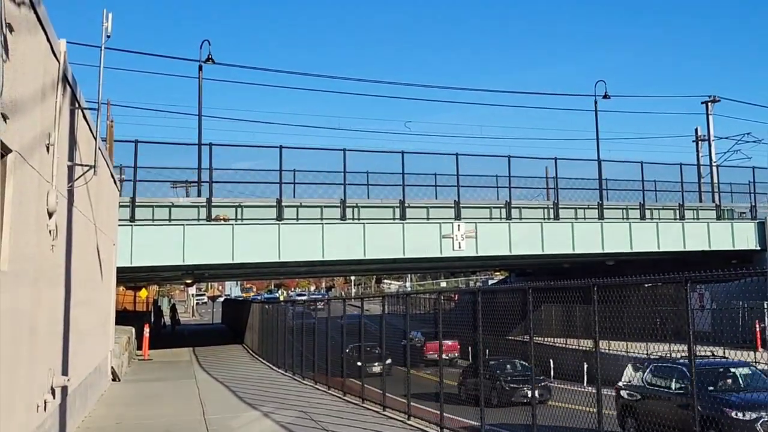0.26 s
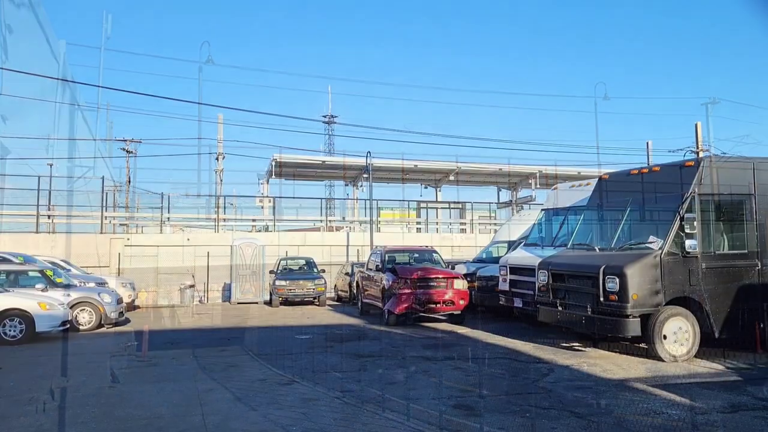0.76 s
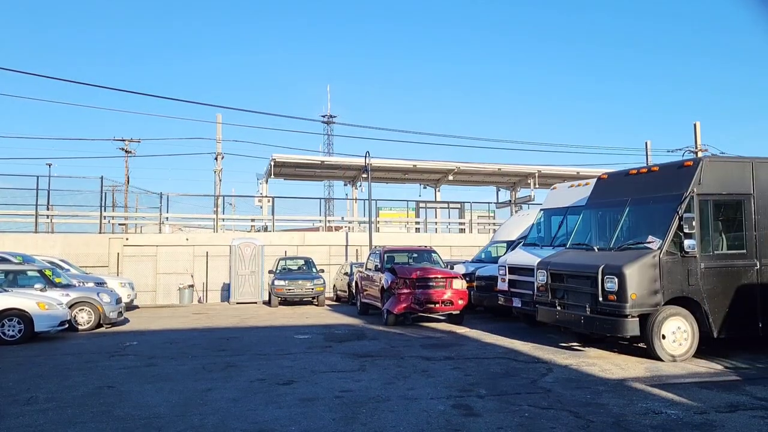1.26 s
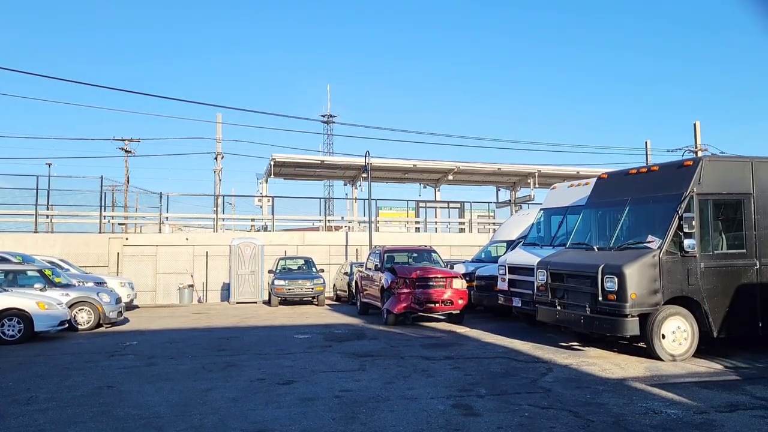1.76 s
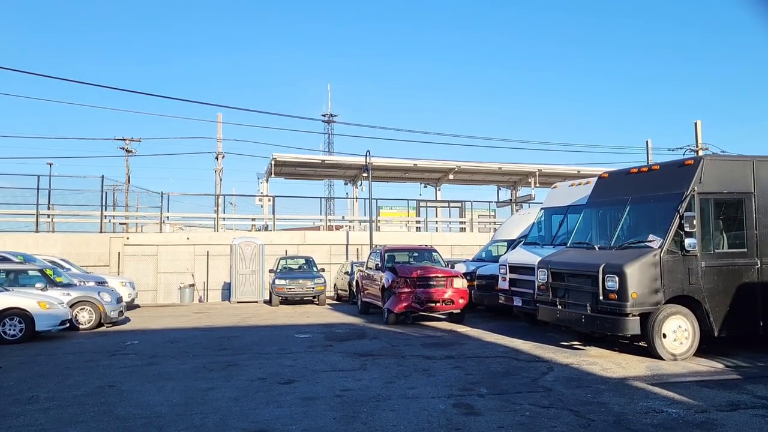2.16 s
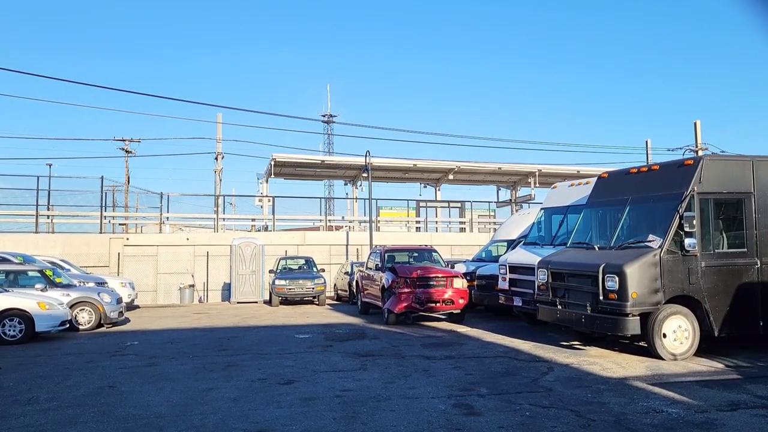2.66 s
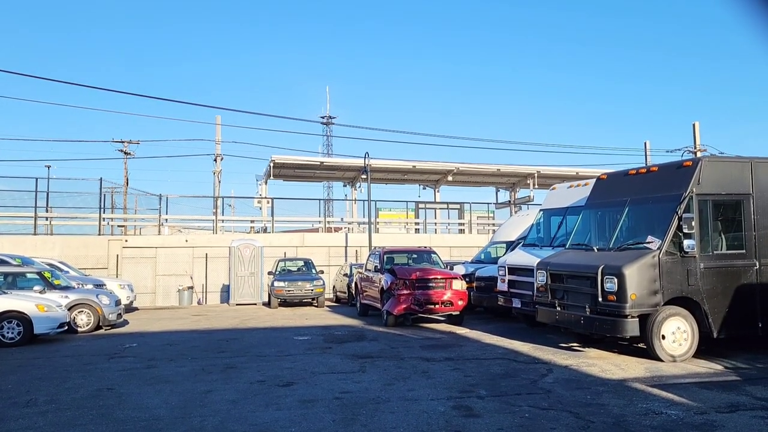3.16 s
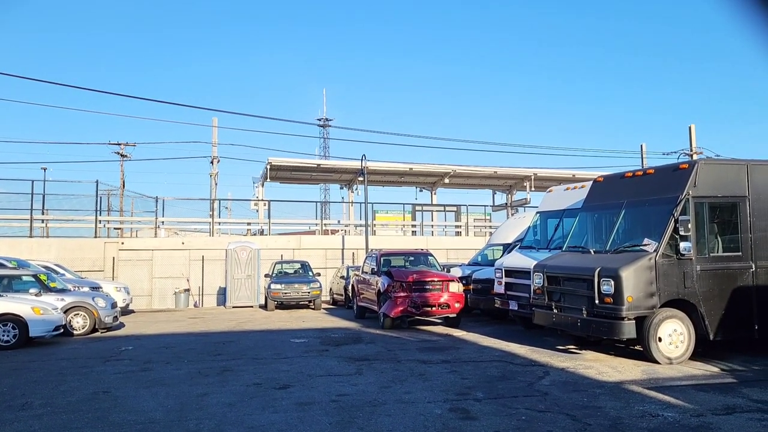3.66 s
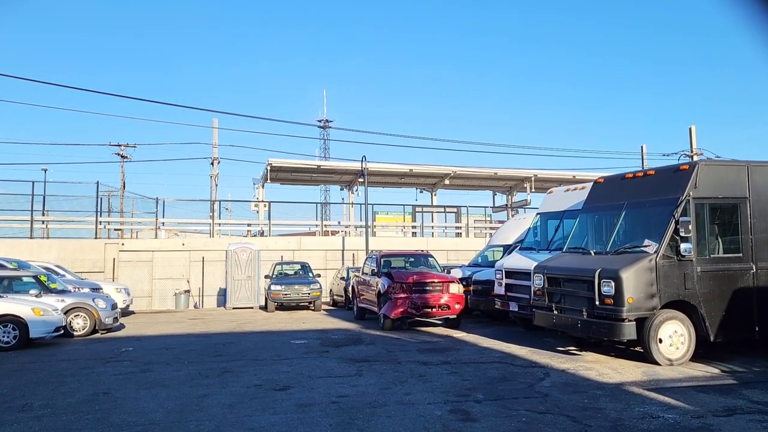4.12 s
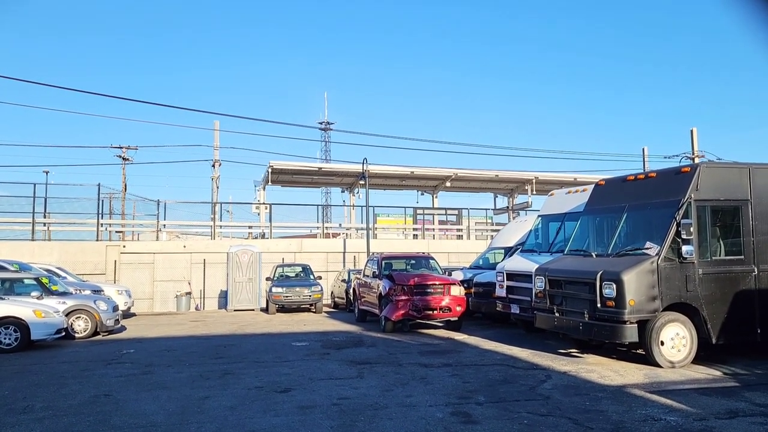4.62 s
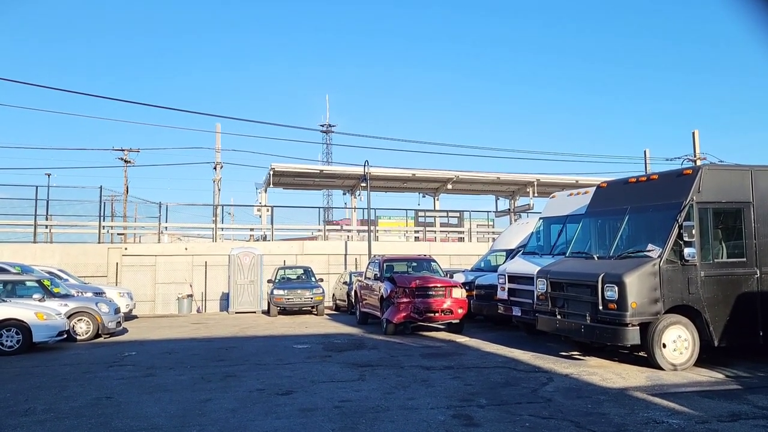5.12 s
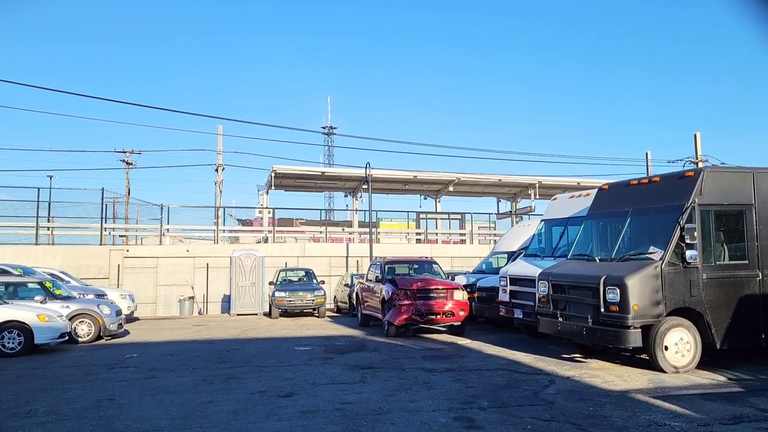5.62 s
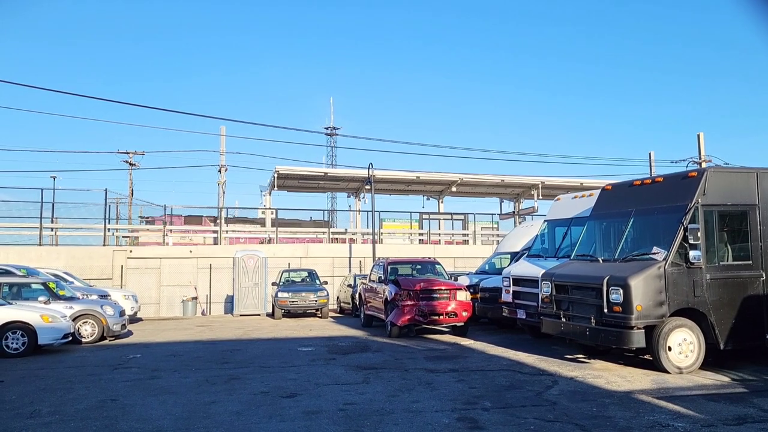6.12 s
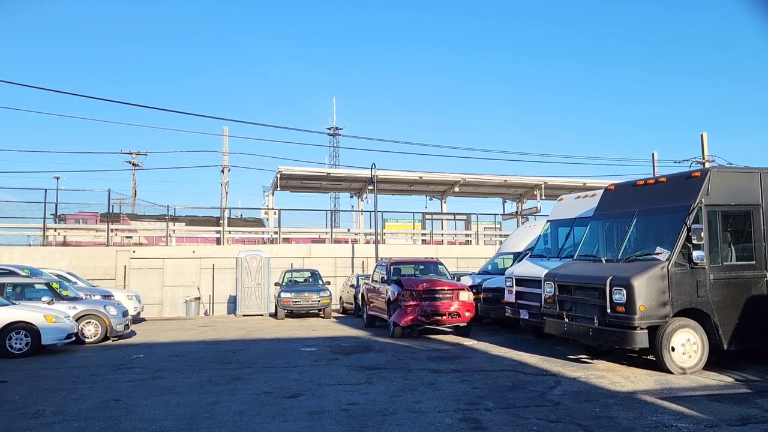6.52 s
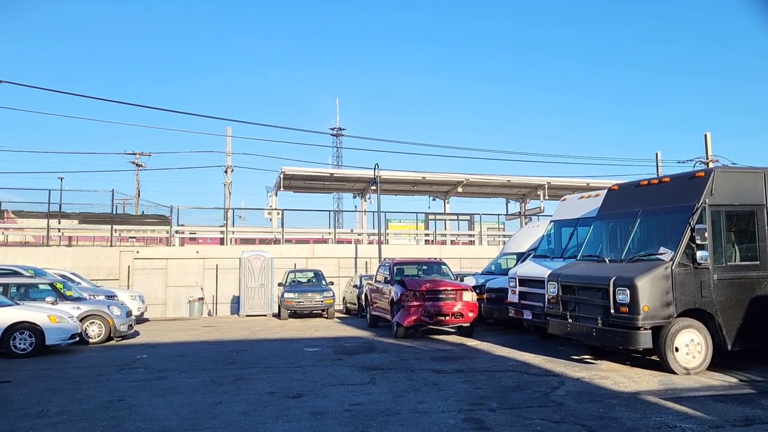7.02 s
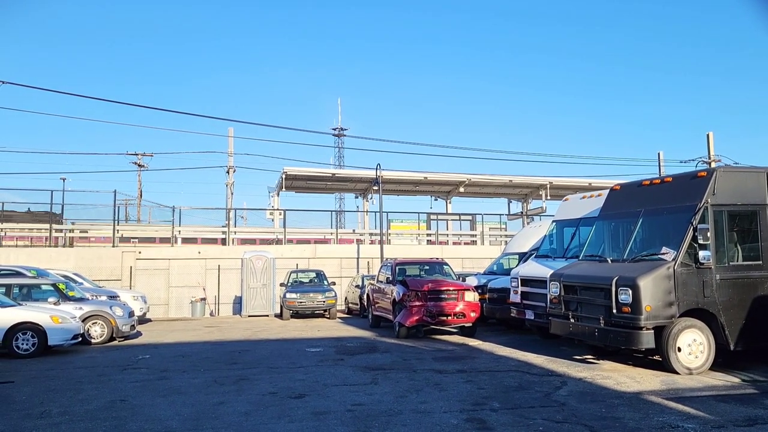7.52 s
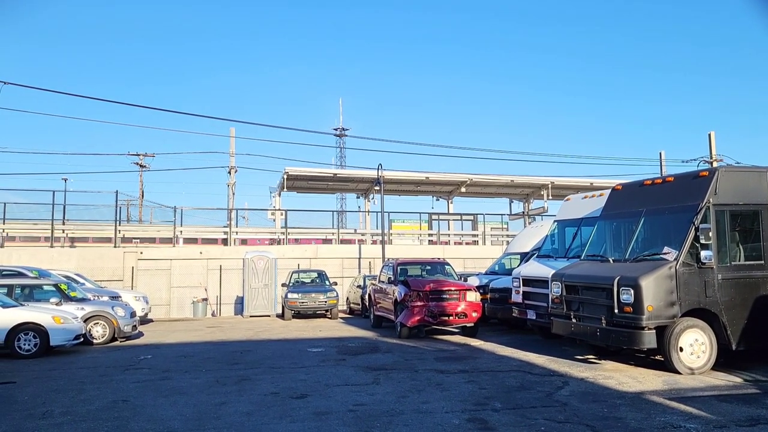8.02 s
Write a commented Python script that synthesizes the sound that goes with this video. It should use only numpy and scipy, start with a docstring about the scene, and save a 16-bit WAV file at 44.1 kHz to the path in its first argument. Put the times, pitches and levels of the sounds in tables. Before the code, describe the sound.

A diesel train draws near with a low pulsing boom, one sharp air spit and growing wheel noise, after passing cars fade out.

```python
"""A parking lot 36 m from a raised track, on a stereo pair of microphones, with the town humming far off.
Tyres and a revving motor under a bridge fade out as a diesel train draws near from the right. Its exhaust
booms and throbs as the engine eases and picks up, a generator and a car body drone, and the wheels roar,
sing and scrape ever louder until they come abreast. A valve spits air once and rings round the lot;
a few light ticks and clinks sound, with a faint rustle at the start."""
import sys
import numpy as np
from scipy import signal
from scipy.fft import rfft, irfft
from scipy.io import wavfile
from scipy.ndimage import uniform_filter1d

SR = 44100
rng = np.random.default_rng(int(sys.argv[2]) if len(sys.argv) > 2 else 0)


def wrap_up_sound(samples):
    """Save the sound to the file named by the first command line argument, as 16-bit audio."""
    columns = np.atleast_2d(samples).T
    # keep every value between -1 and 1, then stretch to whole-number steps
    tamed = np.clip(columns, -1, 1)
    steps = np.round(tamed * 32767).astype(np.int16)
    wavfile.write(sys.argv[1], SR, steps)


N = 365148
TIME = np.arange(N) / SR
FRAME_TIME, HZ = np.arange(N // 256 + 5) * 256 / SR, np.fft.rfftfreq(1024, 1 / SR)  # short-time grid

# a straight track at steady speed; each part of the train is nearest the microphones at its own moment
SPEED_M_PER_S, DISTANCE_M, SOUND_M_PER_S = 14.3, 36, 343
HEAD_NEAREST_S, WHEELS_NEAREST_S, GENERATOR_NEAREST_S = 5.96, 7.36, 7.5
ABREAST = (7.12, .47)  # the droning car goes by: t/s, half length/s

# colour of the microphone pair: f/Hz, left minus right/dB
MIC_BALANCE = [(60, 6), (150, 1.5), (500, 0.7), (900, 0.9), (1350, -2), (2000, -4), (3000, 4.5), (4300, -2),
               (5500, 6.5), (6800, 10.5), (8300, 12), (9600, -0.5), (12000, -1), (15000, 7)]
# noise spectra of far traffic, high rustle and tyres under the bridge: f/Hz, level/dB
TOWN_SPECTRUM = [(150, -8.5), (230, -8.5), (340, 4), (410, -1), (520, -2), (700, -4), (950, -11),
                 (1200, -16.5), (2200, -17), (4000, -41), (16000, -85.5)]
RUSTLE_SPECTRUM = [(2500, -23), (5500, 5), (8000, -4.5), (9500, -3), (13000, -2.5), (16000, -9.5)]
TYRE_SPECTRUM = [(35, -41), (55, -12), (85, -3.5), (125, -1.5), (190, -7), (235, -5.5), (310, -8),
                 (480, -14.5), (580, -12), (800, -19), (1100, -19), (1500, -24.5), (2100, -25), (2550, -30),
                 (4200, -32), (6200, -45), (8100, -48.5), (9500, -56.5), (14500, -57), (16000, -49.5)]
# puffs of rustle: t/s, half length/s, level/dB
RUSTLE_PUFFS = [(.08, .3, -57), (1.18, .08, -72), (1.37, 0.11, -66), (1.55, .06, -65.5), (1.66, .1, -77)]
# ticks and clinks, and last a wheel scrape: t/s, relative level/dB, centre f/Hz, width/octaves, decay/s
TICKS_AND_SCRAPE = [(0.947, -54, 6500, 0.45, 0.0018), (.983, -60, 8500, .7, .0015),
                    (1.428, -49, 13000, 0.33, 0.0019), (1.729, -65, 10000, 0.8, .002),
                    (2.148, -70, 12000, .4, .016), (2.203, -45, 1750, .5, .016),
                    (2.266, -32, 750, 0.5, 0.004), (2.348, -46, 1850, .6, .008),
                    (3.074, -37.5, 2170, 0.1, 0.018), (3.078, -65, 6030, 0.57, .02),
                    (4.494, -42, 3000, 0.55, 0.033)]
# motor revving on the road: t/s, cycle rate/Hz
MOTOR_REVS = [(0, 14.4), (.3, 14.6), (.6, 15.3), (.85, 14.9)]
# its tones: multiple of the cycle, relative starting level/dB, fall/(dB/s)
MOTOR_ORDERS = [(3.5, -8, 4), (6, 0.5, -2), (8.5, 1, 16), (10, 4.5, 5), (11, -2, 2), (14, -14.5, 3),
                (16, 4, 16), (19, -11.5, 11.5), (20, -12, 0), (22, -19, 2.5), (26, -15, 8)]

# spectra of the valve's opening pop and its air jet: f/Hz, level/dB
POP_SPECTRUM = [(600, -30), (1200, 0), (1550, 2), (2100, 0), (3100, 1), (4000, -4), (5500, -11),
                (7300, -21), (8150, -12), (9200, -31), (16000, -28)]
JET_SPECTRUM = [(600, -35), (1200, -16), (1450, 0), (1700, 3), (2000, 6), (3200, 3), (4100, -1), (5000, -5),
                (6200, -7.5), (7200, -9), (8300, -6), (9100, -17), (12200, -11.5), (14500, -7),
                (16000, -20)]
# ring of the spit round the lot: f/Hz, time to fall by 60 dB in s
LOT_DECAY = [(1000, 1), (3000, 1), (5000, 0.46), (8000, 0.56), (8650, 0.66), (9500, 0.39), (16000, 0.28)]
# resonances of the valve's metal, and of wheel and rail: f/Hz, width/Hz, lift/dB
VALVE_MODES = [(1910, 120, 6), (2650, 90, 3), (3100, 90, 5), (3870, 180, 8), (5230, 100, 4), (7960, 200, 7),
               (8600, 200, 4), (12150, 500, 7)]
WHEEL_MODES = [(1000, 57, 1), (1535, 50, 1), (2980, 96, 0.5), (5230, 100, 4.5), (7800, 220, 4)]

# spectra of car body, rail-head sizzle, scrapes, wheel roar, rail hiss and track bed: f/Hz, level/dB
BODY_SPECTRUM = [(90, -23), (160, -11), (205, 3), (250, -2), (310, 0), (370, -3), (420, -18), (900, -47.5),
                 (16000, -110)]
SIZZLE_SPECTRUM = [(2500, -24), (5500, 1.5), (8000, -0.5), (10300, -1.5), (12800, -2.5), (13400, -9.5),
                   (16000, -18)]
SCRAPE_SPECTRUM = [(1100, -29), (1400, -1), (1700, -10), (2400, -8.5), (2850, 0), (3400, -0.5),
                   (4200, -0.5), (5000, -12), (5800, -21), (8200, -24.5), (9500, -40), (16000, -60)]
ROAR_SPECTRUM = [(200, -20.5), (340, -4.5), (430, -1), (560, 2.5), (780, -1.65), (1000, -3), (1180, -9.5),
                 (1440, -4.5), (1650, -11.5), (1850, -10), (2200, -16.5), (2550, -24), (4000, -43),
                 (16000, -87)]
HISS_SPECTRUM = [(1000, -2.5), (2000, 1), (2550, -1), (2900, 1), (3400, 0.5), (4100, -1), (5000, -5.5),
                 (5700, -14), (6800, -17), (8200, -22), (9100, -29), (12500, -40), (16000, -46)]
RUMBLE_SPECTRUM = [(25, -33), (45, 0), (70, 3), (115, 4.5), (150, 4.5), (200, 3.5), (290, 0), (380, -4),
                   (900, -44), (16000, -100)]
# scrapes of wheel on rail: t/s, half length/s, level/dB
SCRAPES = [(5.632, 0.074, -47), (5.778, .055, -40.5), (6.06, .1, -48), (6.33, 0.05, -43),
           (6.485, 0.11, -45.5), (6.782, 0.093, -48.5), (7.083, .04, -41.5), (7.3, .035, -47.5)]
# singing wheels: f/Hz, width/Hz, level/dB, loudest t/s, half length/s
WHEEL_TONES = [(997, 11, -42.5, 5.8, 1.15), (971, 29, -42.5, 6.47, 0.68), (910, 18, -42.5, 6.45, 1.1),
               (880, 18, -42.5, 6.7, .45), (1330, 37, -45.5, 6.45, .6), (1382, 45, -45.5, 6.7, 1),
               (1527, 65, -48, 6.9, 0.94), (890, 60, -37.5, 7.72, .2), (1008, 50, -43.5, 7.72, .2)]
# surges over rough rail: t/s, half length/s, roar lift/dB, hiss lift/dB
RAIL_SURGES = [(1.3, .5, 3.5, 4.7), (3, 0.28, 0.8, 3), (3.95, .2, 2, 2), (4.422, 0.41, 3, 2),
               (5.152, .3, 0, 2), (6.146, .13, -1, -1), (6.85, .5, -0.5, 1.3), (7.803, .2, 2, 1.2)]
# the track bed swells under load: t/s, half length/s, lift/dB
RUMBLE_SWELLS = [(4.48, 0.22, 7), (5.0, .25, 2.5), (5.752, 0.24, 1.5)]

# the generator's firing tone and its octave: t/s, level/dB
GENERATOR_FIRING = [(0.9, -32), (3.74, -33.5), (4.04, -40.5), (4.52, -23), (4.72, -39), (5.0, -22),
                    (5.84, -25.5), (6.78, -37.5), (7.6, -21.5), (8.26, -23.5)]
GENERATOR_OCTAVE = [(0.9, -44.5), (3.28, -51.5), (3.95, -44.5), (4.2, -38.5), (4.7, -40), (5.55, -43),
                    (5.8, -35), (6.2, -35), (6.72, -43.5), (6.92, -28.5), (8.26, -46)]
# its weaker tones: multiple of the cycle, base level/dB, lift under load/dB, lift abreast/dB
GENERATOR_ORDERS = [(9, -58.5, 5.5, 8.5), (14.5, -51, 12.5, 1), (16, -52, 5, 9), (18, -50.5, 1.5, 9),
                    (19, -54, 0.5, -4), (20, -59, 2, 14), (22, -56.5, 1.5, 8), (23, -54, -1.5, 1),
                    (24, -50, -3.5, 5.5)]
# the diesel easing and picking up: t/s, firing rate/Hz
DIESEL_FIRING = [(0, 51.7), (2.5, 52), (3, 49.3), (3.5, 44.6), (3.9, 43.3), (4.6, 45.3), (5.4, 48.6),
                 (5.95, 50.2), (6.6, 50.4), (7.2, 48.8), (8.28, 49.4)]
# exhaust boom at the firing rate: t/s, level/dB
EXHAUST_BOOM = [(0.0, -48), (0.32, -30), (1.2, -28), (1.27, -17.5), (1.5, -20.5), (1.8, -13.5),
                (2.44, -15.1), (3.08, -21.5), (3.42, -34.5), (4.25, -23.5), (4.55, -16), (4.72, -16),
                (5.08, -19.5), (5.3, -20), (5.74, -28.5), (5.9, -22.5), (6.4, -16), (6.7, -23.5),
                (7.12, -24.5), (7.28, -18), (7.64, -19), (7.72, -26), (7.86, -28), (7.93, -15.5),
                (8.26, -14.5)]
# weaker exhaust tones: multiple of the shaft rate, level against the throb tone/dB
EXHAUST_ORDERS = [(7, -22.5), (10, -26.5), (11, -17.5), (12, -10), (14, -19.5), (15, -17), (17, -17.5),
                  (19, -21), (23, -27)]


def amp(db):
    """Decibels to gain."""
    return 10 ** (np.asarray(db) / 20)


def unit(x):
    """Scales to rms 1."""
    return x / np.sqrt(np.mean(x ** 2) + 1e-20)


def curve(points):
    """A table joined by straight lines in time."""
    return np.interp(TIME, *np.transpose(points))


def colour(points):
    """A table joined on a log-frequency axis."""
    f, value = np.transpose(points)
    return np.interp(np.log(HZ + 1), np.log(f), value)


def resonances(modes):
    """Lift in dB that a set of resonances gives each frequency."""
    return sum(db / (1 + ((HZ - hz) / (width / 2)) ** 2) for hz, width, db in modes)


def swell(s, half_length, t=TIME):
    """A smooth rise and fall that reaches 1 at time s."""
    return np.exp(-((t - s) / half_length) ** 2)


def drift(rate_hz):
    """A smooth random wander of rms about 1."""
    t = TIME[::32]
    lowpass = np.exp(-(np.fft.rfftfreq(len(t), t[1]) / rate_hz) ** 2)
    wander = irfft(rfft(rng.standard_normal(len(t))) * lowpass, len(t))
    return np.interp(TIME, t, unit(wander))


def tone(turns, db):
    """A sine of given rms level."""
    return np.sqrt(2) * amp(db) * np.cos(2 * np.pi * turns)


def wavering(turns, db, fading, rate_hz):
    """A tone arriving along several changing paths: its level and phase wander."""
    in_phase = tone(turns, db) * (1 + fading * drift(rate_hz))
    return in_phase + tone(turns + 1 / 4, db) * fading * drift(rate_hz)


def sight(nearest_s, t=TIME):
    """A part of the train: dB lost against its nearest point, and bearing sine (negative on approach)."""
    along = SPEED_M_PER_S * (t - nearest_s)
    distance = np.hypot(along, DISTANCE_M)
    return 20 * np.log10(distance / DISTANCE_M), along / distance


def mic_spectra(lag_ms, direct, spacing_ms=0.54):
    """Noise at the pair: a direct share reaches the left lag_ms later, the rest comes from all round."""
    a, b, c, d = rng.standard_normal((4, len(FRAME_TIME), len(HZ)))
    diffuse = np.sinc(2 * HZ * spacing_ms / 1000)
    coherence = direct * np.exp(2j * np.pi * HZ * lag_ms / 1000) + (1 - direct) * diffuse
    left = a + 1j * b
    right = coherence * left + np.sqrt(np.maximum(1 - abs(coherence) ** 2, 0)) * (c + 1j * d)
    balance = amp(colour(MIC_BALANCE) / 2)
    return np.array([left * balance, right / balance])


def waveform(spectra):
    """Short-time spectra to sound."""
    return signal.istft(spectra.transpose(0, 2, 1), nperseg=1024, noverlap=768)[1][:, :N]


def noise(spectrum, direct, patchy_db, shade_db=0, far_lag_ms=0.35):
    """Stereo noise, rms 1 in the middle, with drifting colour; its direct share follows the train's head."""
    bearing = sight(HEAD_NEAREST_S, FRAME_TIME)[1][:, None]
    spectra = mic_spectra(-far_lag_ms * bearing, direct)
    patches = uniform_filter1d(rng.standard_normal(spectra.shape[1:]), size=16, axis=0)
    patches = unit(uniform_filter1d(patches, size=9, axis=1))
    x = waveform(spectra * amp(colour(spectrum) + patchy_db * patches + shade_db))
    return x / np.std(x.mean(0))


def microphone_hiss(db=-87):
    """The faint even hiss of the two microphones."""
    return amp(db) * rng.standard_normal((2, N))


def town(db=-45):
    """Far traffic hums all round the lot."""
    return amp(db + 0.5 * drift(3.4)) * noise(TOWN_SPECTRUM, direct=0.19, patchy_db=1.5)


def rustle(crackles_per_s=70, spread_db=2, decay_s=.0015):
    """A few faint puffs of high hiss with a fine crackle in them."""
    puffs = sum(amp(db) * swell(s, half) for s, half, db in RUSTLE_PUFFS)
    onsets = rng.random(N) < crackles_per_s / SR
    sizes = amp(spread_db * np.minimum(rng.exponential(1, N), 3))
    crackle = signal.lfilter([1], [1, -np.exp(-1 / (decay_s * SR))], onsets * sizes)
    level = puffs * unit(1 + crackle) * amp(1.5 * drift(120))
    return level * noise(RUSTLE_SPECTRUM, direct=.2, patchy_db=-0.5)


def ticks_and_scrape(trim_db=-0.5):
    """Light ticks and clinks, and one brief scrape from the train's wheels: each a dying band of noise."""
    out, t = np.zeros((2, N)), TIME[:SR // 2]
    f = np.fft.rfftfreq(len(t), 1 / SR) + 1
    age = t - t.mean()
    for s, db, hz, octaves, decay_s in TICKS_AND_SCRAPE:
        band = unit(np.exp(-.5 * (np.log2(f / hz) / octaves) ** 2))
        burst = rng.standard_normal((2, len(t))) * (age > 0) * np.exp(-abs(age) / decay_s)
        start = round((s - t.mean()) * SR)
        out[:, start:start + len(t)] += amp(db + trim_db) * irfft(rfft(burst) * band, len(t))
    return out


def road(motor_db=-30, tyres_db=-24, tyres_fall_db_per_s=11, fade_from_s=0.73, fade_db_per_s=54):
    """Tyres and a revving motor echo under the bridge, then fade out together."""
    turns = np.cumsum(curve(MOTOR_REVS)) / SR
    motor = sum(wavering(order * turns, motor_db + db - fall * TIME, fading=.2, rate_hz=8.8)
                for order, db, fall in MOTOR_ORDERS)
    tyres = amp(tyres_db - tyres_fall_db_per_s * TIME) * noise(TYRE_SPECTRUM, direct=0.18, patchy_db=1)
    return (motor + tyres) * amp(-fade_db_per_s * np.maximum(TIME - fade_from_s, 0))


def air_spit(s=2.6225, pop_db=-22.3, jet_db=-36.5, ring_db=-36, lag_ms=.44):
    """A valve to the right pops open and spits air; its metal rings, walls and parked cars throw it back."""
    age, frame_age = np.maximum(TIME - s, 0), np.maximum(FRAME_TIME - s, 0)[:, None]
    pop = unit(waveform(mic_spectra(lag_ms, direct=.8) * amp(colour(POP_SPECTRUM))))
    jet = unit(waveform(mic_spectra(lag_ms, direct=.75) * amp(colour(JET_SPECTRUM))))
    spit = amp(pop_db) * pop * np.exp(-age / .005) + amp(jet_db) * jet * np.exp(-age / .018)
    echoes = mic_spectra(lag_ms, direct=.1) * amp(colour(JET_SPECTRUM) + resonances(VALVE_MODES))
    ring = waveform(echoes * amp(-60 * frame_age / colour(LOT_DECAY))) / np.std(waveform(echoes))
    opening = 1 - np.exp(-age / 0.002)
    return opening * (spit + amp(ring_db) * ring)


def body_drone(db=-34):
    """A car body hums while it is abreast of the microphones."""
    return amp(db) * swell(*ABREAST) * noise(BODY_SPECTRUM, direct=0.82, patchy_db=0.5)


def sizzle(near_db=-74, steepness=2.8, flare_db=7):
    """The thin top of the wheel noise on the rail head: it grows with nearness and flares once."""
    level_db = near_db - steepness * sight(WHEELS_NEAREST_S)[0] + flare_db * swell(6.92, .13)
    return amp(level_db + 1.2 * drift(30)) * noise(SIZZLE_SPECTRUM, direct=.2, patchy_db=1.5)


def scrapes():
    """Brief, grainy swells of hiss as the wheels rub the rail."""
    level = sum(amp(db) * swell(s, half) for s, half, db in SCRAPES)
    return level * amp(0.83 * drift(70)) * noise(SCRAPE_SPECTRUM, direct=0.16, patchy_db=2)


def singing(pitch_rise_per_s=.004):
    """Wheels shaken by the rail ring in narrow tones; each microphone gets its own mix of paths."""
    clock = np.cumsum(1 + pitch_rise_per_s * (TIME - HEAD_NEAREST_S)) / SR
    out = np.zeros((2, N))
    for hz, width, db, s, half in WHEEL_TONES:
        shaking = np.array([drift(width / 2) + 1j * drift(width / 2) for mic in range(2)])
        out += amp(db) * swell(s, half) * (shaking * np.exp(2j * np.pi * hz * clock)).real
    return out


def rolling_levels(t=TIME):
    """Roar, hiss and rumble in dB: each rises from a far-off floor as the wheels near, with surges."""
    loss_db = sight(WHEELS_NEAREST_S, t)[0]

    def approach(near_db, steepness, floor_db):  # steepness 1 falls as 1 / distance
        return 20 * np.log10(np.hypot(amp(near_db - steepness * loss_db), amp(floor_db)))

    roar_lift, hiss_lift = sum(np.outer(lifts, swell(s, half, t)) for s, half, *lifts in RAIL_SURGES)
    rumble_lift = sum(db * swell(s, half, t) for s, half, db in RUMBLE_SWELLS)
    return (approach(near_db=-31.5, steepness=1.78, floor_db=-53.5) + roar_lift,
            approach(near_db=-40, steepness=2.18, floor_db=-63) + hiss_lift,
            approach(near_db=-30.5, steepness=3.5, floor_db=-45) + rumble_lift)


def wheels():
    """Rolling shakes the track bed and rings the wheels and rails; distance dulls the hiss."""
    roar_db, hiss_db, rumble_db = rolling_levels()
    below_peak_db = rolling_levels(FRAME_TIME)[1][:, None] - hiss_db.max()
    dull_db = 0.46 * below_peak_db * np.log2(np.clip(HZ, 2500, 9000) / 3600)
    ring_db = resonances(WHEEL_MODES)
    rough_rail = drift(42)  # rough stretches lift roar and hiss together
    roar = noise(ROAR_SPECTRUM, direct=0.48, patchy_db=1, shade_db=ring_db)
    roar *= amp(roar_db + 0.5 * rough_rail)
    hiss = noise(HISS_SPECTRUM, direct=0.082, patchy_db=1, shade_db=dull_db + ring_db)
    hiss *= amp(hiss_db + 0.55 * rough_rail)
    rumble = amp(rumble_db) * noise(RUMBLE_SPECTRUM, direct=.5, patchy_db=1)
    return roar + hiss + rumble


def generator(cycle_hz=15.04, cylinders=6):
    """A steady engine whose pitch sinks as it goes by; its upper tones grow with nearness."""
    doppler = 1 / (1 + SPEED_M_PER_S / SOUND_M_PER_S * sight(GENERATOR_NEAREST_S)[1])
    turns = np.cumsum(cycle_hz * doppler) / SR
    firing = cylinders * turns
    roar_db = rolling_levels()[0]
    near_db = 0.13 * (roar_db - roar_db.mean())
    load = swell(4.85, .42)  # it takes load for a moment
    hum = tone(firing, curve(GENERATOR_FIRING))
    hum += wavering(2 * firing, curve(GENERATOR_OCTAVE), fading=0.22, rate_hz=7.8)
    for order, db, load_db, abreast_db in GENERATOR_ORDERS:
        level_db = db + near_db + load_db * load + abreast_db * swell(*ABREAST)
        hum += wavering(order * turns, level_db, fading=0.35, rate_hz=2.5)
    fade_in = np.interp(TIME, [.45, .85], [0, 1])
    return hum * fade_in * amp([[.5], [-.5]])  # a little louder on the left


def exhaust(firings_per_turn=8, throb_far_db=-33, throb_lift_db=10.5, beat_crest_s=6.395):
    """The diesel booms at its firing rate; a tone about 6 Hz higher beats with it, amid weaker tones."""
    firing = np.cumsum(curve(DIESEL_FIRING)) / SR
    firing -= np.interp(beat_crest_s, TIME, firing)  # boom and throb are in phase here
    shaft = firing / firings_per_turn
    throb_db = throb_far_db + throb_lift_db * swell(HEAD_NEAREST_S, 0.92)
    boom = tone(firing, curve(EXHAUST_BOOM)) + tone(firing + shaft, throb_db)
    for order, db in EXHAUST_ORDERS:
        boom += wavering(order * shaft, throb_db + db, fading=0.63, rate_hz=5.9)
    return boom * amp([[.8], [-.8]])  # a little louder on the left


def scene():
    """Everything that reaches the microphones in the lot."""
    train = exhaust() + generator() + body_drone() + wheels() + scrapes() + singing() + sizzle()
    return road() + town() + train + air_spit() + ticks_and_scrape() + rustle() + microphone_hiss()


def record(dry):
    """Fades of 3 ms at both ends, and the recorder's steep treble limit."""
    ends = np.sin(np.pi / 2 * np.minimum(np.minimum(TIME, TIME[::-1]) / .003, 1)) ** 2
    lowpass = signal.firwin(511, cutoff=15850, window=("kaiser", 9), fs=SR)
    return signal.oaconvolve(dry * ends, lowpass[None], "same")


dry = scene()
out = record(dry)
wrap_up_sound(out)
```